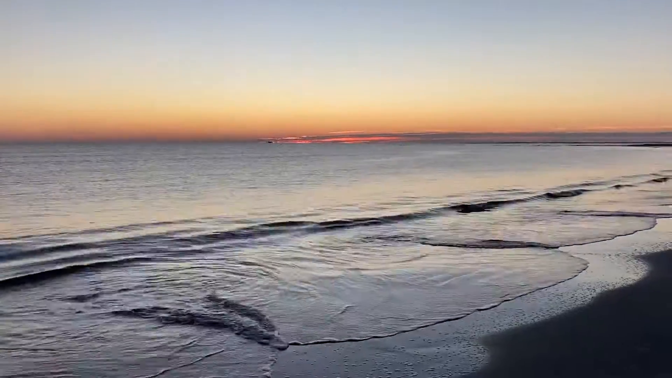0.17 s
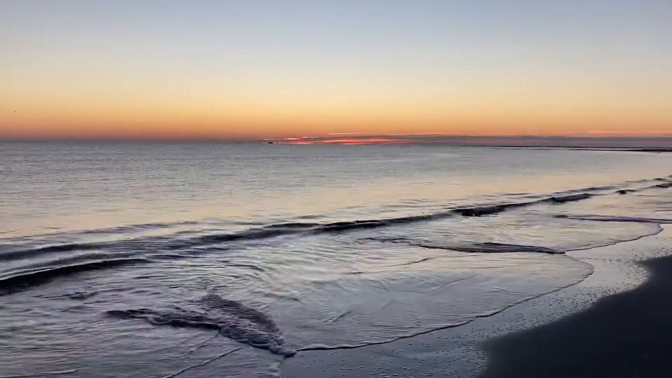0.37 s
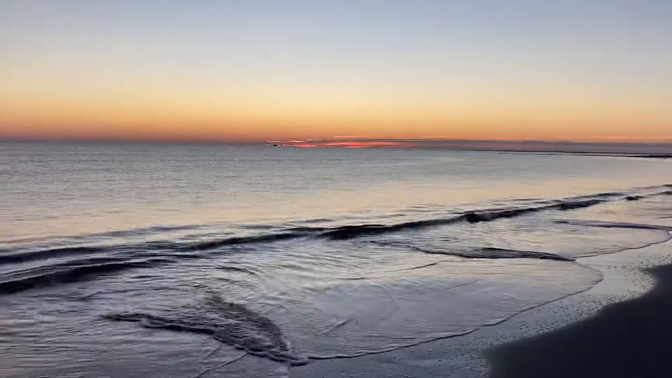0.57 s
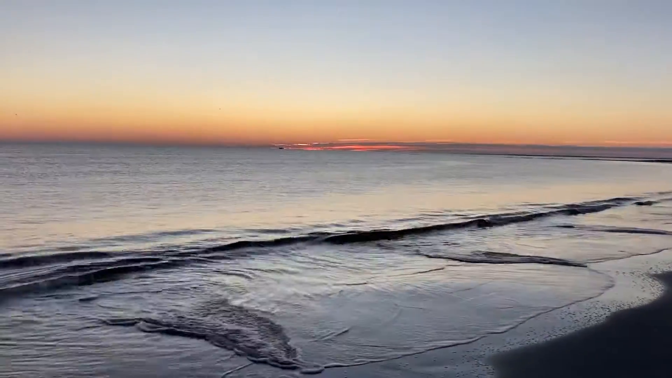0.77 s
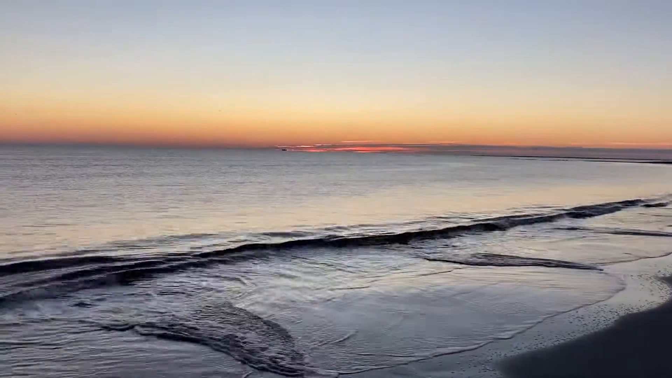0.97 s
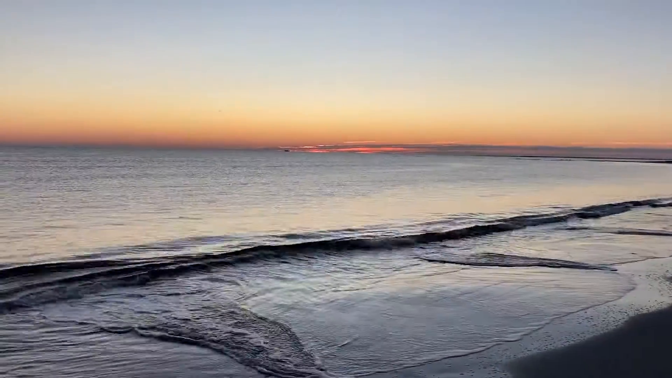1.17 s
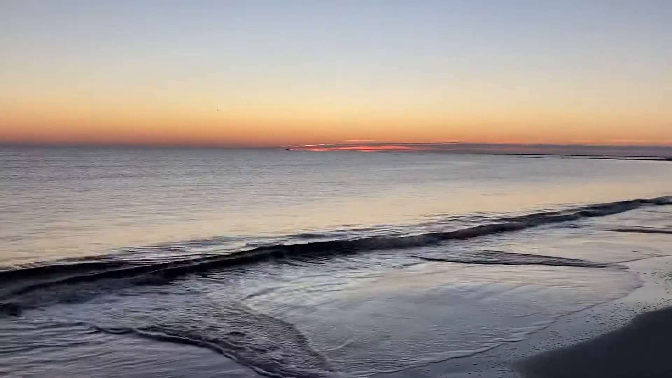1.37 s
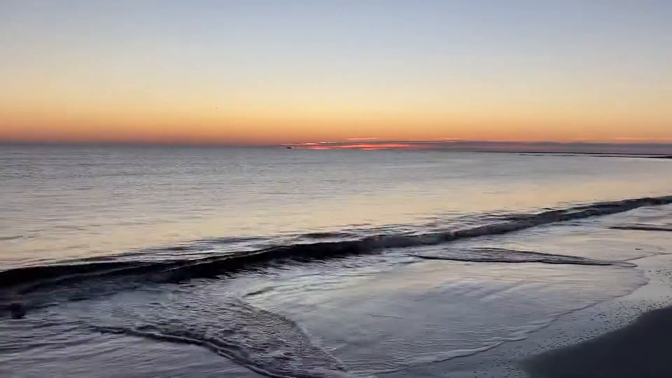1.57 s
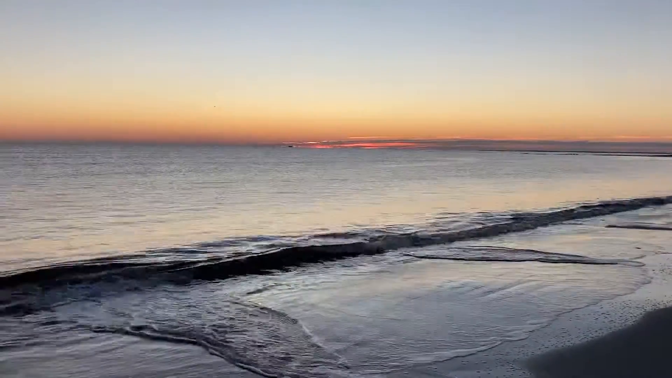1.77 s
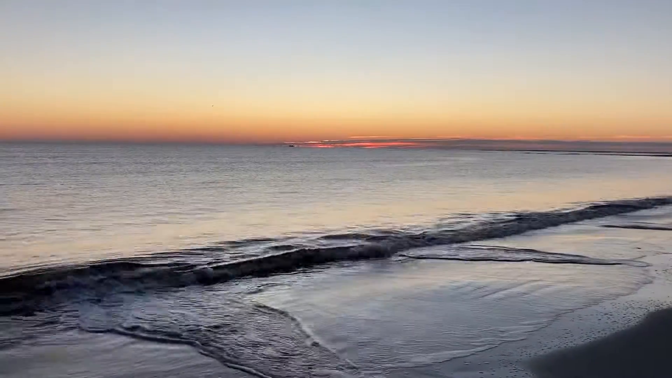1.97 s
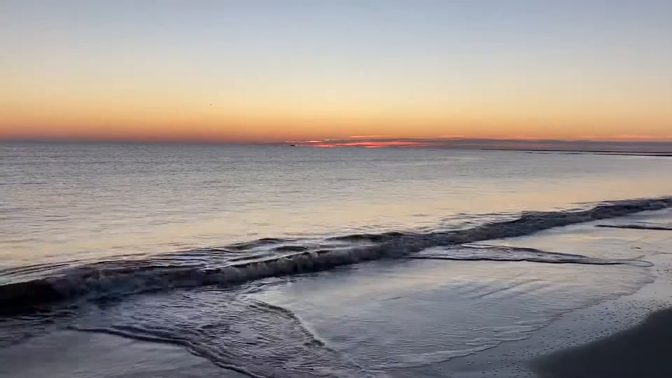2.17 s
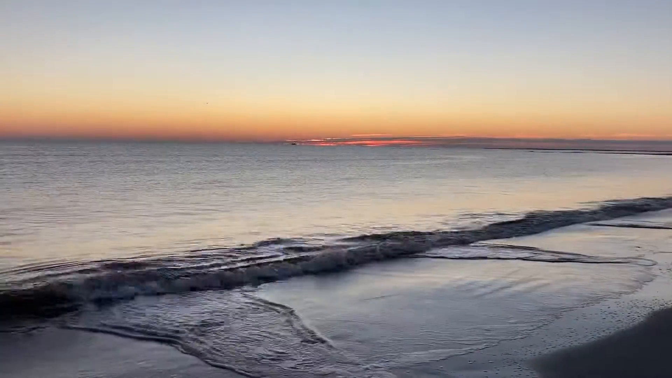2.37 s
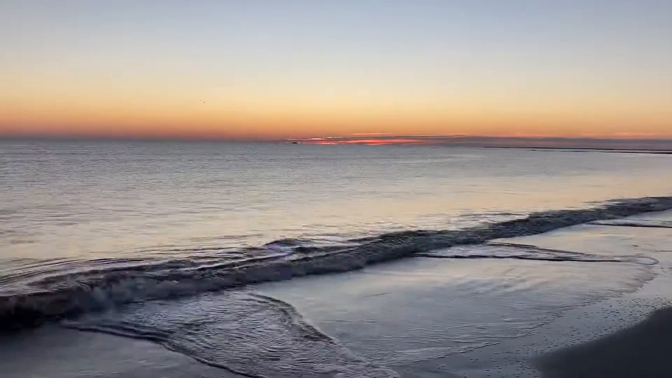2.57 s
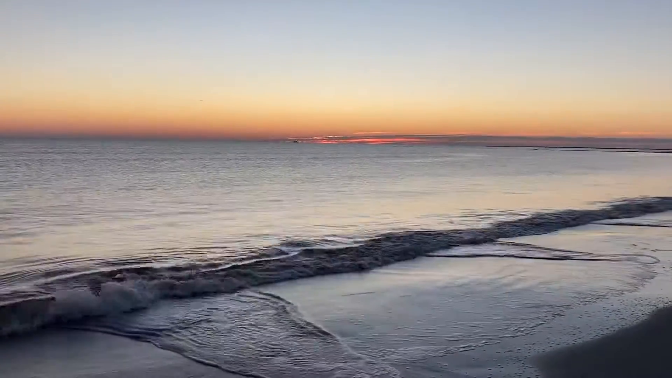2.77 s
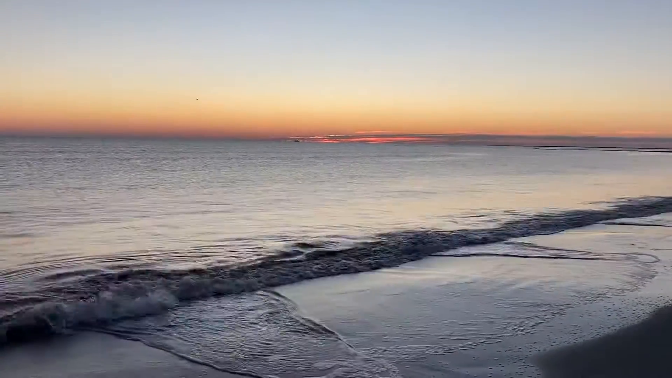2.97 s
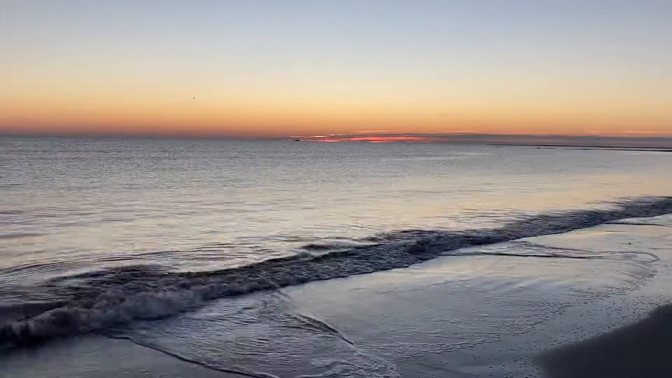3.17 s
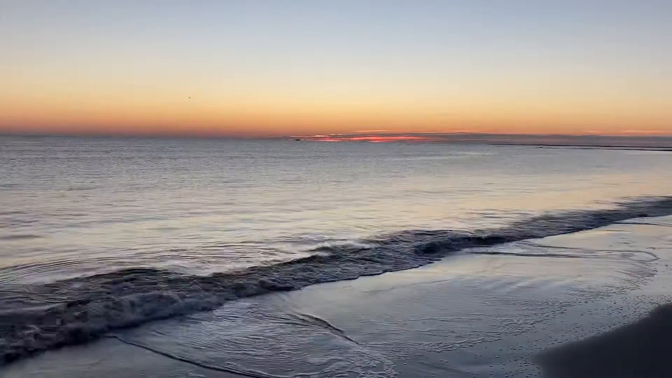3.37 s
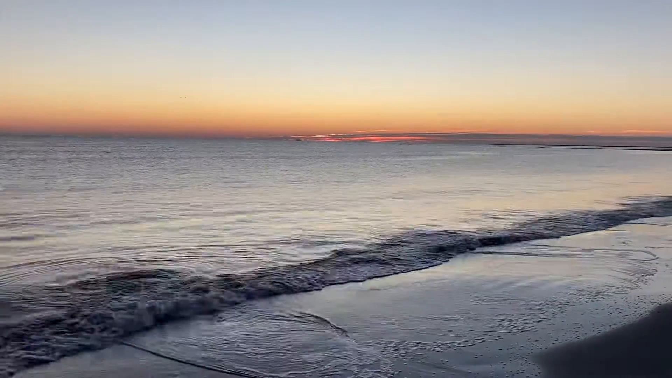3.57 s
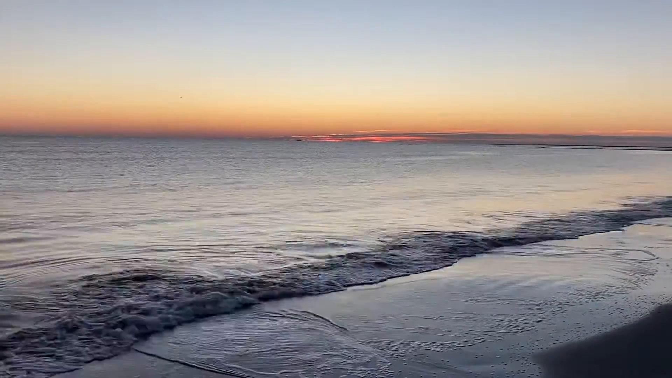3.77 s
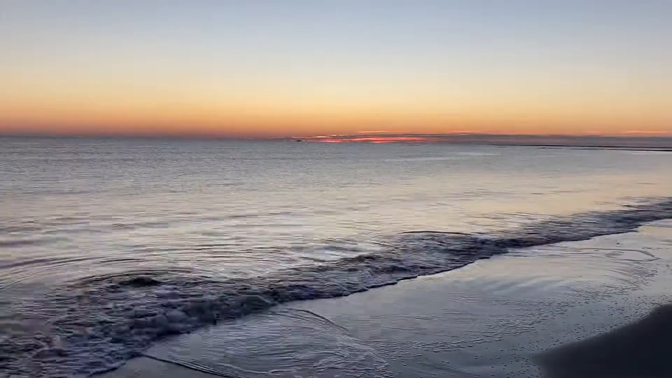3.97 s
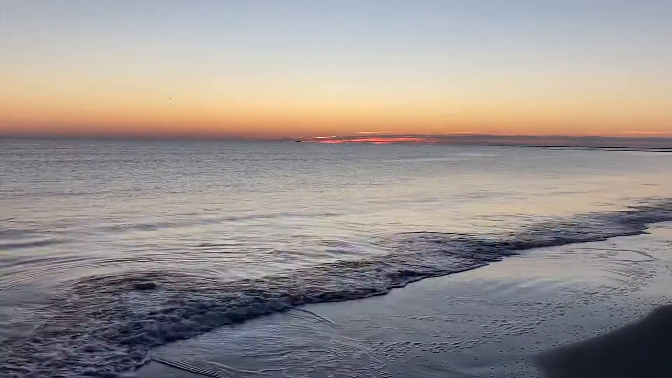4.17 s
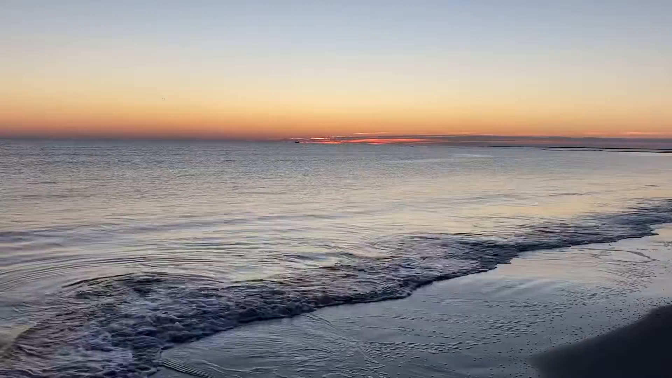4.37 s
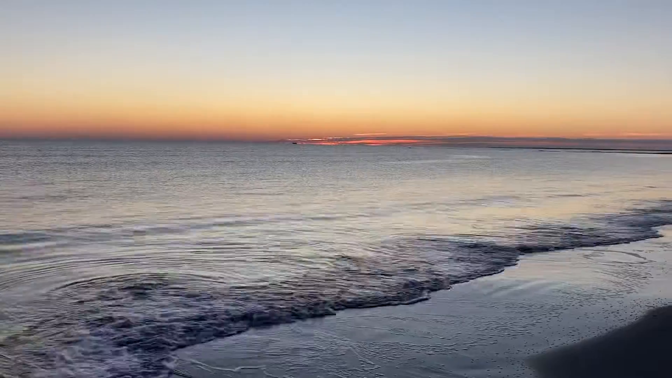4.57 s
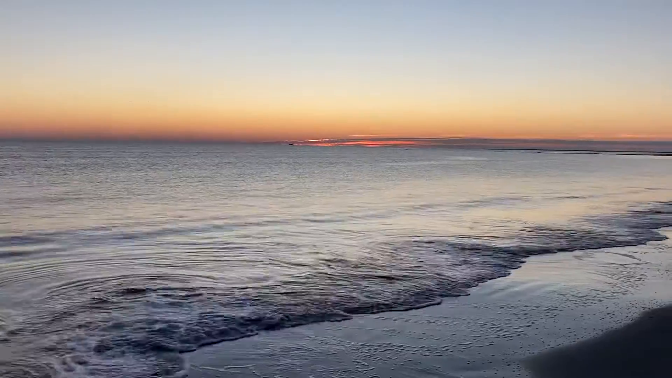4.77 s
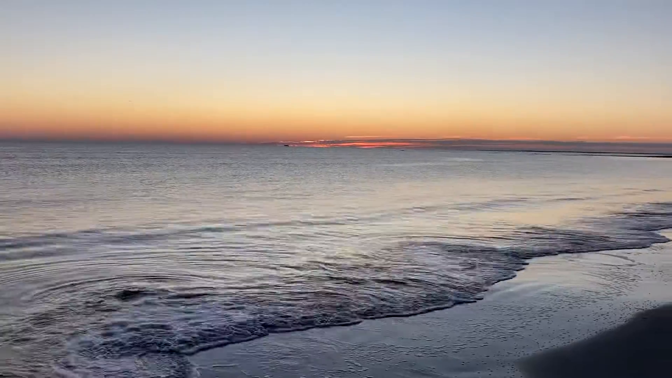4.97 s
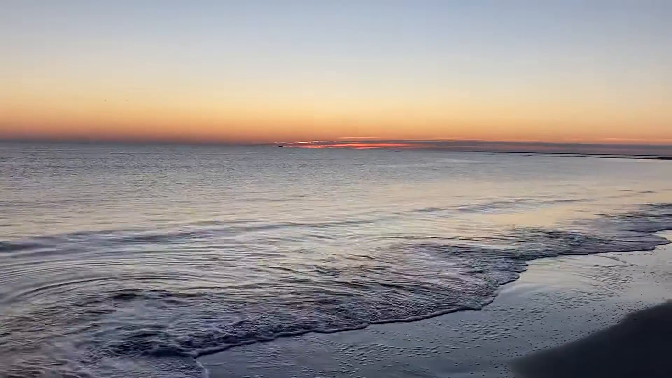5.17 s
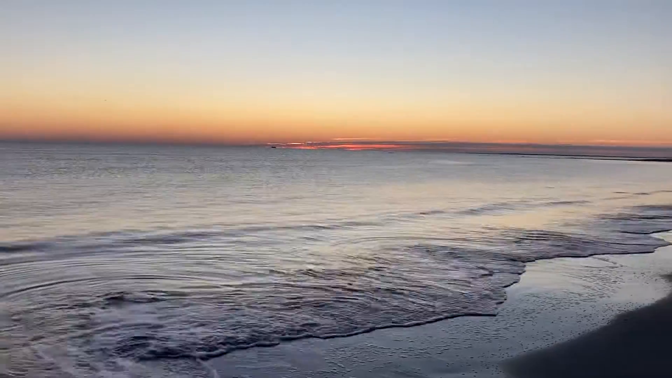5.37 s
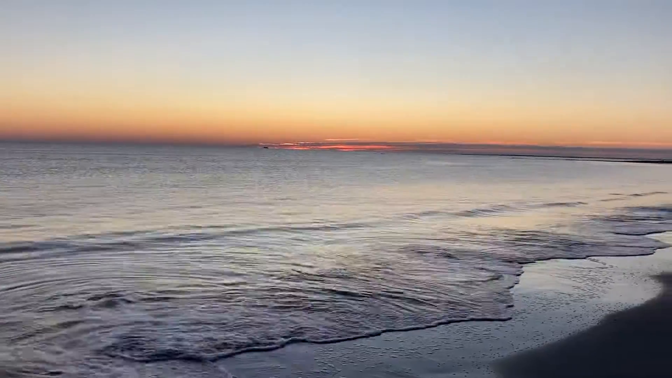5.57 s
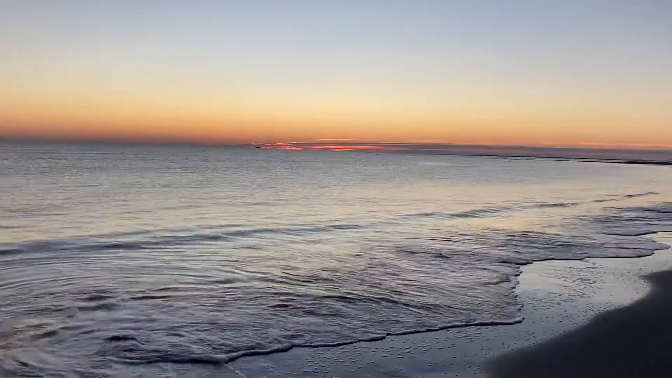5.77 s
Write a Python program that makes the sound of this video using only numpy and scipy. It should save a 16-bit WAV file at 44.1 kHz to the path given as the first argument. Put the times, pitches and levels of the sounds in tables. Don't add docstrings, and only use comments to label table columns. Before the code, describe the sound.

Close stereo phone capture at the waterline: quiet lapping with tiny spray ticks, then a small breaker growing over two seconds and tumbling on the left. It fades quickly into fizzing, draining foam, with a single crisp pop. Irregular bass wind thuds run throughout, strongest mid-way and near five seconds; a faint distant hum lies beneath, and a short bird trill comes late.

```python
import sys
import numpy as np
from scipy import signal
from scipy.fft import rfft, irfft, next_fast_len
from scipy.io import wavfile
from scipy.ndimage import uniform_filter1d, map_coordinates

SR = 44100
rng = np.random.default_rng(int(sys.argv[2]) if len(sys.argv) > 2 else 0)


def undo_db(level):
    steps = np.asarray(level, float) / 20
    return 10 ** steps


def unload_wav(signal):
    wavfile.write(
        sys.argv[1],
        SR,
        np.round(np.clip(np.atleast_2d(signal).T, -1, 1) * 32767).astype(np.int16),
    )


N = 257191

# pitch_hz, level_db
HUM_TONE = (119.5, -50)
# start_s, length_s, start_hz, end_hz, level_db
BIRD_NOTES = [
    (5.228, .031, 2590, 2700, -46),
    (5.262, .012, 3650, 3550, -59),
    (5.272, .02, 2680, 2650, -44),
    (5.3, .006, 3500, 3500, -55),
    (5.305, .021, 2680, 2600, -44),
    (5.335, .008, 3480, 3420, -54),
    (5.343, .015, 2620, 2520, -45),
    (5.368, .017, 3470, 3450, -53.5),
    (5.386, .026, 3430, 3250, -58),
]
# start_s, peak_db, plop_db, left_minus_right_db, length_s
NEAR_DROPS = [
    (0.642, -40.5, -10, -0.5, 0.002),
    (0.8031, -40, -5, -0.5, 0.0018),
    (0.835, -44, -1, -0.5, 0.002),
    (0.885, -41, -2, -3, 0.0027),
    (1.192, -52, 7, -1.0, 0.002),
    (1.416, -54, 6, -1.0, 0.002),
    (2.077, -34.5, 11.5, 7, 0.0018),
]
# freq_hz, level_db_per_hz
SPRAY_COLOUR = [(2500, -120), (4000, 14.5), (6000, 4), (9000, -6), (12000, 2), (15500, -10), (16200, -120)]
# freq_hz, level_db
SNAP_COLOUR = [(250, -120), (500, 9), (1000, 4.5), (1500, -2), (2400, 6), (3400, -12), (4600, -1),
               (6500, -8), (8500, 9), (10000, -10), (16000, -120)]
SNAP_S, SNAP_DB = 4.3518, -10
# freq_hz, left_lead_rad
PORT_PHASE = [(5800, 1.8), (6900, .25), (7500, -.3), (8500, -2.8), (9600, -3.4), (11100, -5.9),
              (12100, -6.6), (13100, -9.1), (14300, -9.7), (15400, -12.3), (16000, -12.7)]
# time_s, level_db
BREEZE = [
    (0.0, -46),
    (0.86, -51),
    (1.1, -55),
    (2.6, -47.5),
    (3.86, -48),
    (4.93, -44),
    (5.2, -46.5),
    (5.83, -44),
]
# peak_s, peak_db
EDDY_PEAKS = [(.02, -37.5), (.13, -35), (.22, -42), (.76, -43), (1.15, -33), (1.44, -45), (1.54, -37),
              (2.06, -35), (2.16, -36), (2.4, -25), (2.49, -28), (2.61, -29), (2.74, -42), (2.86, -46),
              (2.97, -26.5), (3.18, -31), (3.44, -32), (3.96, -36), (4.43, -45), (4.62, -35.5),
              (4.67, -35.5), (4.75, -33.5), (4.84, -36), (4.91, -33.5), (5.07, -30.5), (5.37, -39),
              (5.46, -31), (5.6, -38), (5.72, -38), (5.8, -34.5)]
EDDY_RISE_S, EDDY_FALL_S, BREEZE_DB = 0.024, 0.027, 3.5
# start_s, peak_db, pitch_hz, left_minus_right_db, length_s
PRESSURE_SWELLS = [(0.227, -30, 64.6, 5, 0.0066), (0.763, -36, 75.4, -2, 0.0052),
                   (1.399, -32, 116.3, -1, 0.012), (2.144, -24, 92, -2, 0.0085),
                   (4.179, -27, 134, 2, 0.0018), (4.452, -34.5, 120, 1, 0.0081),
                   (4.651, -28.5, 64, 3, 0.0053), (4.961, -23.5, 61.6, -3, 0.0085),
                   (5.054, -20.5, 61.9, 0.5, 0.0055), (5.074, -22, 76, 4, 0.0063),
                   (5.448, -33.5, 123, -0.5, 0.0093), (5.709, -29, 95, 0, 0.0082)]
# freq_hz, level_db_per_hz
BUFFET_COLOUR = [(15, -120), (25, -22), (45, -2), (70, -3.5), (110, -8.5), (160, -12), (300, -26),
                 (500, -29), (800, -120)]
# time_s, break_force_db, froth_db (how thin and bubbly the water runs)
WAVE_COURSE = [(0, -48, -4.5), (.41, -45.5, -3), (.53, -42.5, -1), (.68, -44, -2), (1.05, -40.5, -5),
               (1.45, -36.5, -2), (1.85, -33, -1.5), (2.25, -30.5, -1), (2.58, -27.5, -1.5),
               (3.02, -28.5, 1), (3.22, -30.5, -0.5), (3.46, -37, 2.5), (3.95, -40.5, 1.5), (4.3, -44, 2.5),
               (4.7, -50.5, 3.5), (5.11, -53.5, 3), (5.47, -52.5, -1.5), (5.83, -53.5, -1.5)]
# peak_s, lift_db, fall_s, brightness (0
CREST_SURGES = [(0.519, 7, 0.0081, .4), (0.56, 2, 0.013, 0), (0.6, 5, 0.031, 1.6), (0.832, 14, 0.011, 2.3),
                (1.05, 7, .02, 1.3), (1.13, 4, 0.027, 0.79), (1.186, 4, 0.018, 1.7),
                (1.228, 4, 0.011, 0.69), (1.403, 6, 0.016, 0), (1.817, 3, 0.012, 2),
                (2.064, 7.5, 0.01, 0.89), (2.617, 5, 0.019, 2.3), (2.682, 1.5, 0.017, 1.2),
                (2.964, 2.5, 0.064, 1.7), (2.465, -1.5, 0.014, 0.44), (3.122, 3, 0.047, -0.54),
                (1.3, 3, 0.047, 1.2), (4.345, -5, 0.037, 0.27)]
SURGE_REACH = 1.64
SURGE_RISE_RATIO = 0.24
# time_s, left_share (0-1)
LEFT_SHARE = [
    (0, 0.3),
    (.6, 0.18),
    (1.2, 0.17),
    (1.5, 0.28),
    (1.8, 0.64),
    (2.6, 0.83),
    (3.3, 0.88),
    (4.2, 0.52),
    (5, 0.78),
    (5.83, 0.94),
]
# freq_hz, level_db_per_hz
ROAR_COLOURS = [
    [(35, -120), (60, -38), (110, -5.5), (250, -2), (400, -6), (650, -1), (1150, -5.5), (1450, -10.5), (2200, -120)],
    [(35, -120), (60, 5), (110, 5), (250, -6), (400, -4.5), (650, -4.5), (1100, 1), (1500, -5), (2200, -120)],
]
# freq_hz, level_db_per_hz
SPLASH_COLOURS = [
    [(900, -120), (1150, 10), (1450, 1.5), (2300, 3), (2900, 0), (3600, -2.5), (4800, -8.5), (6000, -12), (6600, -10), (6900, -120)],
    [(900, -120), (1200, -17.5), (1600, 3.5), (2250, -0.5), (2800, -9), (3600, -16), (4800, -10), (6000, -15), (6600, -13.5), (6900, -120)],
]
# freq_hz, level_db_per_hz
FOAM_COLOUR = [(2200, -120), (3000, -0.5), (4500, -3.5), (5800, -6.5), (7000, 0.5), (9000, 1.5),
               (11500, -1.5), (13500, -7.5), (15600, -6.5), (16200, -120)]
# freq_hz, likeness (0-1)
WATER_LIKENESS = [(100, 0.86), (300, 0.74), (700, 0.86), (1500, 0.77), (3000, 0.19), (6000, 0.56)]
SPLASH_DB, FOAM_DB, FOAM_FROTH = -2, -9.5, 1.2
SEA_DB = -57
DEEP_HZ, DEEP_DB, DEEP_FROTH, DEEP_FORCE = 364, 5, -.8, .12


def unit(x):
    return x / np.sqrt(np.mean(x ** 2) + 1e-20)


def along(points, hz):
    f, v = np.transpose(points)
    return np.interp(np.log(hz + 1), np.log(f + 1), v)


def curves(rows):
    s, *cols = np.transpose(rows)
    return [np.interp(np.arange(N) / SR, s, c) for c in cols]


def wobble(rate_hz):
    return map_coordinates(rng.standard_normal(400), [np.arange(N) * rate_hz / SR], mode="wrap")


def bump(peak_s, rise_s, fall_s):
    t = np.arange(N) / SR - peak_s
    return np.exp(-.5 * (t / np.where(t < 0, rise_s, fall_s)) ** 2)


def panned(pan_db):
    return pan_db * np.array([[.5], [-.5]])


def filtered(x, response):
    m = next_fast_len(N + SR // 2)
    return irfft(rfft(x, m) * response(np.fft.rfftfreq(m, 1 / SR)), m)[..., :N]


def patchy(patchy_db):
    z = signal.stft(rng.standard_normal((2, N)), nperseg=512)[2]
    field = uniform_filter1d(rng.standard_normal(z.shape[1:]), size=4, axis=0)
    field = uniform_filter1d(field, size=10, axis=1)
    return unit(signal.istft(z * undo_db(patchy_db * unit(field)), nperseg=512)[1][:, :N])


def heard(pair, spectrum, alike, lead_rad):
    m = next_fast_len(N + SR // 4)
    hz = np.fft.rfftfreq(m, 1 / SR)
    spread = np.arccos(np.clip(along(alike, hz), -1, 1)) / 2
    mid, side = rfft(pair, m) * undo_db(along(spectrum, hz)) * [np.cos(spread), np.sin(spread)]
    half = np.exp(.5j * lead_rad(hz))
    return unit(irfft(np.array([(mid + side) * half, (mid - side) / half]), m)[:, :N])


def hum():
    pitch_hz, level_db = HUM_TONE
    phase = 2 * np.pi * np.cumsum(pitch_hz + 0.64 * wobble(4.19)) / SR
    return undo_db(level_db + 2.5 + 2 * wobble(8)) * np.sin(phase)


def bird():
    out = np.zeros(N)
    for s, length_s, start_hz, end_hz, db in BIRD_NOTES:
        u = np.arange(round(length_s * SR)) / (length_s * SR)
        note = np.sin(2 * np.pi * np.cumsum(start_hz + (end_hz - start_hz) * u) / SR)
        out[round(s * SR):][:len(u)] += undo_db(db + 0.5) * note * np.sin(np.pi * u) ** 0.36
    decay_s = 0.072
    blur = rng.standard_normal((2, 3000)) * undo_db(-60 * np.arange(3000) / SR / decay_s)
    wet = signal.fftconvolve(out[None], blur / np.linalg.norm(blur[0]), axes=1)[:, :N]
    direct = np.array([out, np.roll(out, 3)]) * undo_db([[.7], [-.7]])
    return direct + undo_db(-20) * wet


def buffet():
    eddies = sum(undo_db(db) * bump(s, EDDY_RISE_S, EDDY_FALL_S) for s, db in EDDY_PEAKS)
    return np.hypot(undo_db(curves(BREEZE)[0] + BREEZE_DB), eddies)


def wind():
    lumps = buffet() * undo_db(wobble(25) + np.array([wobble(19), wobble(15)]) - 3.0)
    rumble = heard(patchy(patchy_db=1.5), BUFFET_COLOUR, [(40, 0.45), (150, 0.36)], lambda hz: 0 * hz)
    out = lumps * rumble
    t = np.arange(-SR // 8, SR // 8) / SR
    turns = rng.random((len(PRESSURE_SWELLS), 2))
    for (s, db, hz, pan_db, length_s), turn in zip(PRESSURE_SWELLS, turns):
        swell = np.exp(-.5 * ((t - 2.05 * length_s) / length_s) ** 2)
        port_turn = 0.042 * (turn[1] - .5) * np.array([[1], [-1]])
        push = swell * np.sin(2 * np.pi * (hz * t + turn[0] + port_turn))
        at = round(s * SR) + np.arange(len(t)) - SR // 8
        inside = (at >= 0) & (at < N)
        out[:, at[inside]] += (undo_db(db + panned(pan_db)) * push)[:, inside]
    return out


def snap():
    click = np.zeros(N)
    click[round(SNAP_S * SR)] = -undo_db(SNAP_DB)

    def burst(hz):
        trail = -2j * np.pi * 0.97 * np.log(1 + hz / 600)
        port_delay = np.outer([-.5j, .5j], 2 * np.pi * hz * .00003)
        return undo_db(along(SNAP_COLOUR, hz) + [[-2], [2]]) * np.exp(trail + port_delay)

    return filtered(click, burst)


def drops():
    spits, plops = np.zeros((2, N)), np.zeros((2, N))
    t = np.arange(-SR // 50, SR // 50) / SR
    for s, db, plop_db, pan_db, length_s in NEAR_DROPS:
        at = slice(round(s * SR) - SR // 50, round(s * SR) + SR // 50)
        gain = undo_db(db + panned(pan_db))
        spits[:, at] += gain * rng.standard_normal(len(t)) * np.exp(-.5 * ((t - .002) / length_s) ** 2)
        plop = np.sin(2 * np.pi * 800 * t) * np.exp(-.5 * ((t - .001) / 0.0011) ** 2)
        plops[:, at] += gain * undo_db(plop_db) * plop

    def spray(hz):
        ports = np.exp(np.outer([.5j, -.5j], along(PORT_PHASE, hz)))
        return undo_db(along(SPRAY_COLOUR, hz) - 4.5) * ports

    return filtered(spits, spray) + plops


def bubbles(count, centre_hz, spread, cycles, scatter_db, size):
    when, pitch = rng.random(count), rng.standard_normal(count)
    big = np.minimum(rng.exponential(size=count), 4)
    hz = np.clip(centre_hz * np.exp(spread * pitch), 80, 15000)[:, None]
    turns = hz * np.arange(size) / SR
    rows = undo_db(scatter_db * big)[:, None] * np.sin(2 * np.pi * turns * (1 + 0.084 * turns / cycles))
    rows *= np.exp(-3 * turns / cycles) * (1 - np.exp(-2 * turns))
    at = (when * N).astype(int)[:, None] + np.arange(size)
    return unit(np.bincount(at.ravel(), rows.ravel(), N + size)[:N])


def water(spectra, patchy_db, grains, share, left):
    sides = []
    for spectrum, lead_s in zip(spectra, (.0004, -.00007)):
        pair = patchy(patchy_db)
        pair[0] += share * grains()
        sides.append(heard(pair, spectrum, WATER_LIKENESS, lambda hz: 2 * np.pi * hz * lead_s))
    from_left = np.sqrt(left) * sides[0] * undo_db([[.9], [-.9]])
    from_right = np.sqrt(1 - left) * sides[1] * undo_db([[-.8], [.8]])
    return from_left + from_right


def effort():
    force_db, froth_db = curves(WAVE_COURSE)
    layer = np.arange(3)[:, None]
    lift_db = 0
    for s, db, fall_s, bright in CREST_SURGES:
        weight = np.clip(1 - abs(layer - bright) / SURGE_REACH, 0, 1)
        lift_db = lift_db + db * weight * bump(s, SURGE_RISE_RATIO * fall_s, fall_s)
    wave_foam_db = force_db + FOAM_DB + FOAM_FROTH * froth_db
    foam_db = 20 * np.log10(np.hypot(undo_db(wave_foam_db), undo_db(SEA_DB)))
    layers_db = np.array([force_db, force_db + SPLASH_DB + froth_db, foam_db]) + lift_db
    deep_db = DEEP_DB + DEEP_FROTH * froth_db + DEEP_FORCE * force_db
    return *layers_db, deep_db


def foam():
    pair = patchy(patchy_db=1.0)
    pair[0] += 0.21 * bubbles(count=12000, centre_hz=9050, spread=0.25, cycles=3.1, scatter_db=5.0, size=40)
    likeness = [(5600, .2), (6600, 0.65), (9000, 0.95), (15000, .95)]
    hiss = heard(pair, FOAM_COLOUR, likeness, lambda hz: along(PORT_PHASE, hz))
    wander = .08 * wobble(18) * np.array([[1j], [-1j]])
    return np.real(signal.hilbert(hiss, next_fast_len(N))[:, :N] * np.exp(wander))


def glugs():
    return bubbles(count=1500, centre_hz=632.5, spread=0.627, cycles=10.2, scatter_db=0, size=500)


def fizz():
    return bubbles(count=4000, centre_hz=3007, spread=0.461, cycles=17.3, scatter_db=3.0, size=260)


def wave():
    roar_db, splash_db, foam_db, deep_db = effort()
    left = np.clip(curves(LEFT_SHARE)[0], 0, 1)
    tumble = wobble(14)
    roar = undo_db(roar_db + 1.14 + 0.044 * tumble) * water(ROAR_COLOURS, 0.14, glugs, 0.23, left)
    roar += (undo_db(deep_db) - 1) * filtered(roar, lambda hz: 1 / (1 + (hz / DEEP_HZ) ** 4))
    splash = undo_db(splash_db + 0.49 * tumble) * water(SPLASH_COLOURS, 2.07, fizz, 0.25, left)
    hiss = undo_db(foam_db + 0.15 * tumble + 0.29 * wobble(6)) * foam()
    return roar + splash + hiss


def scene():
    return hum() + bird() + wind() + snap() + drops() + wave()


def roll_off(x):
    return signal.sosfilt(signal.butter(12, 16920, fs=SR, output="sos"), x)


def record(dry):
    mix = filtered(dry, lambda hz: 1j * hz / (30 + 1j * hz))
    return roll_off(mix)


dry = scene()
out = record(dry)
unload_wav(out)
```